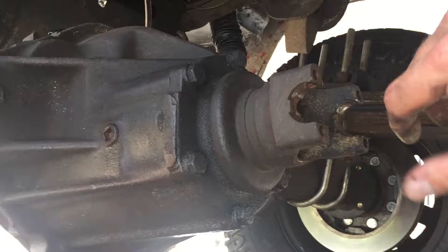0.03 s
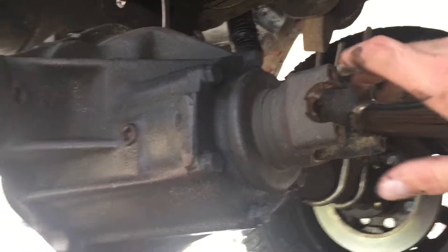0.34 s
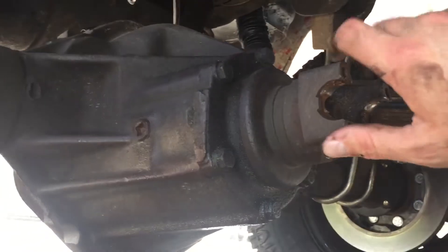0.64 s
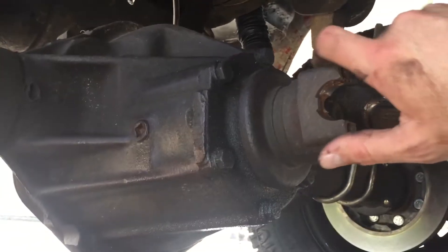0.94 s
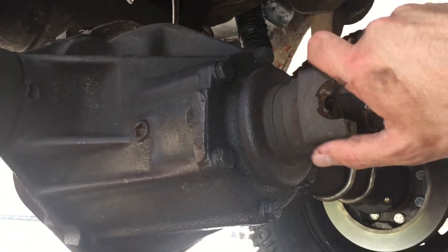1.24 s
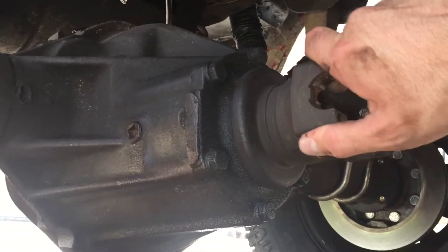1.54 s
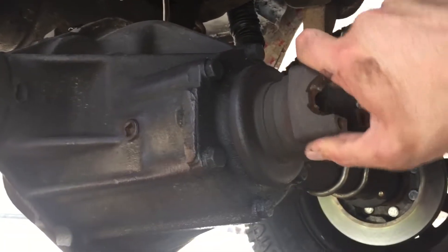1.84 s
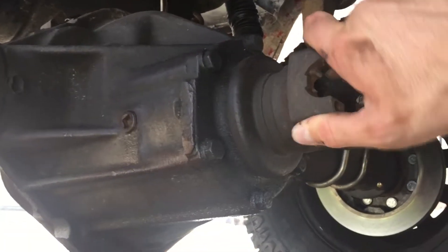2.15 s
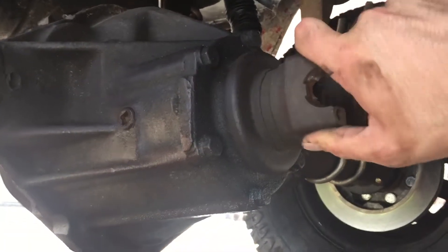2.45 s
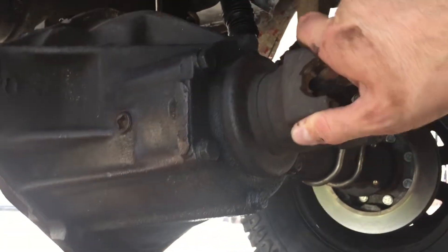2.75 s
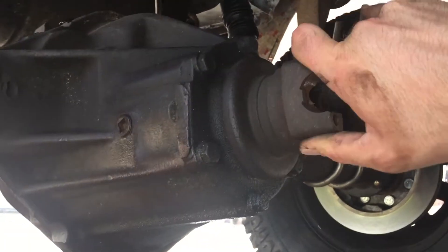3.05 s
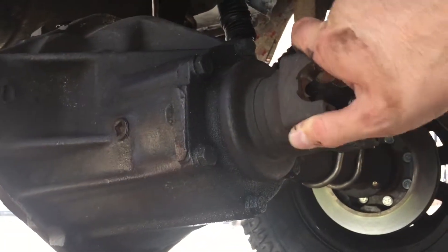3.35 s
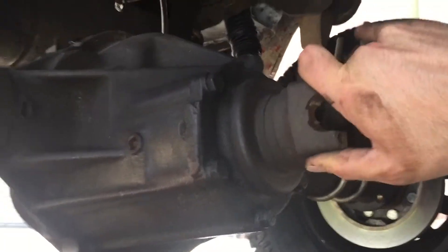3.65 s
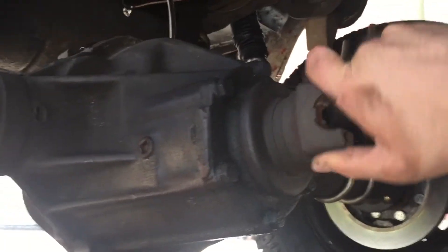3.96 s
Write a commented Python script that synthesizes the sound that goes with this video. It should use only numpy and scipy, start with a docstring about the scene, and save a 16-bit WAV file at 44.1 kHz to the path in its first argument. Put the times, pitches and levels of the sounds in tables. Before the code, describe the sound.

Repeated metal clanks and duller clunks from a hand-rocked axle yoke in a quiet workshop.

```python
"""Rocking a loose axle yoke

A hand rocks the pinion yoke of a vehicle axle to and fro in a quiet workshop. At each end of the
play the gear teeth meet: a bright clank one way, a duller clunk the other, each with a low boom in
the housing. Cloth and skin rustle and squeak faintly. Under it lie the room's rumble, a motor hum
and microphone hiss; the bass swells and bumps towards the end."""
import sys
import numpy as np
from scipy import signal
from scipy.fft import rfft, irfft
from scipy.io import wavfile

SR = 44100
rng = np.random.default_rng(int(sys.argv[2]) if len(sys.argv) > 2 else 0)


def unload_wav(signal):
    """Save mono or channel-first audio to the path in sys.argv[1] as 16-bit WAV at rate SR, clipped to [-1, 1]."""
    wavfile.write(
        sys.argv[1],
        SR,
        np.round(np.clip(np.atleast_2d(signal).T, -1, 1) * 32767).astype(np.int16),
    )


N = 176400
TIME = np.arange(N) / SR


def from_db(db):
    """Decibels to gain."""
    return 10 ** (np.asarray(db) / 20)


def decay(t, t60):
    """Exponential fall of 60 dB in t60 seconds."""
    return np.exp(-np.log(1000) * t / t60)


def attack(t, rise_s):
    """Rise from 0 towards 1 with time constant rise_s."""
    return 1 - np.exp(-t / rise_s)


def swell(crest_s, db, width_s):
    """A bell-shaped rise and fall of level."""
    return from_db(db) * np.exp(-.5 * ((TIME - crest_s) / width_s) ** 2)


def tone(hz, t):
    """A sine that starts at a random phase."""
    return np.sin(2 * np.pi * (hz * t + rng.random()))


def add(out, start_s, sound):
    """Mix a sound in at a time."""
    i = max(int(start_s * SR), 0)
    out[i:i + len(sound)] += sound[:max(N - i, 0)]


def lowpass(x, hz, order):
    """Dull a sound above hz; a higher order cuts more steeply."""
    return signal.sosfilt(signal.butter(order, hz, fs=SR, output="sos"), x)


def at_hz(points, hz):
    """Read (Hz, value) points on a log-frequency axis."""
    points = np.array(points)
    return np.interp(np.log(hz + 1e-9), np.log(points[:, 0]), points[:, 1])


def noise(colour, size=N):
    """Noise of rms 1, coloured by (Hz, relative dB) points."""
    hz = np.fft.rfftfreq(size, 1 / SR)
    x = irfft(rfft(rng.standard_normal(size)) * from_db(at_hz(colour, hz)), size)
    return x / np.sqrt(np.mean(x ** 2) + 1e-20)


def bands(x, edges_hz):
    """Split a sound at the edges, yielding each band's centre in Hz and its signal."""
    spectrum, hz = rfft(x), np.fft.rfftfreq(len(x), 1 / SR)
    for low, high in zip(edges_hz, edges_hz[1:]):
        yield np.sqrt(low * high), irfft(spectrum * ((hz >= low) & (hz < high)), len(x))


def drift(rate):
    """Glide through 400 random values, rate of them a second, then hold the last."""
    return np.interp(TIME * rate, np.arange(400), rng.standard_normal(400))


# Room air with microphone hiss, and a thin band in that hiss. Each row: frequency in Hz, relative dB.
AIR_COLOUR = [(20, -47), (32, -38), (45, -16), (58, 2), (80, -9.5), (120, -5), (165, -8), (210, -13.5),
              (450, -17), (700, -23), (1100, -28.5), (2200, -34), (3600, -35.5), (4400, -39.5),
              (4900, -40.5), (6000, -39), (7400, -43.5), (9000, -41.5), (10500, -55.5), (12000, -54.5),
              (15500, -59.5)]
HISS_COLOUR = [(3500, -59), (4150, 0), (4320, 1), (4550, -3), (4900, -29)]
# The motor's partials. Each row: frequency in Hz, rms level in dB.
HUM_PARTIALS = [(58, -62), (112.5, -57), (167, -53.5), (172, -50)]


def workshop():
    """Room tone: steady air and hiss, and a motor hum that wavers in pitch and level."""
    out = from_db(-48.5) * noise(AIR_COLOUR) + from_db(-76.5) * noise(HISS_COLOUR)
    wander_hz, waver_db = 0.83, 2.5
    for hz, db in HUM_PARTIALS:
        phase = 2 * np.pi * np.cumsum(hz + wander_hz * drift(8.73)) / SR
        out += np.sqrt(2) * from_db(db + waver_db * drift(8)) * np.sin(phase)
    return out


# The rumble's colour. Each row: frequency in Hz, relative dB.
RUMBLE_COLOUR = [(20, -37), (40, -1.5), (60, 2), (120, -6), (170, -3), (230, -7.5), (400, -18.5),
                 (1500, -67)]
# Its fader moves. Each row: time in seconds, level in dB.
RUMBLE_FADER = [(0, -49), (0.9, -71), (1.65, -52), (2.3, -52.5), (3.3, -48), (3.82, -50), (3.88, -32.5),
                (3.94, -37), (4, -34)]
# Soft bass bumps. Each row: crest in seconds, level in dB, half width in seconds, pitch in Hz.
BASS_BUMPS = [(1.255, -44, 0.013, 60.3), (2.80, -39, 0.019, 60), (2.961, -36, 0.014, 65),
              (3.137, -35.5, 0.015, 89.9), (3.48, -35.5, 0.017, 64.3), (3.57, -34.5, 0.018, 55),
              (3.662, -27.5, 0.015, 57.7), (3.90, -32, 0.012, 61), (3.984, -27, 0.024, 59.8),
              (3.915, -30.5, 0.0065, 105.5), (3.975, -36, 0.025, 117.7)]


def rumble():
    """Low rumble with soft bumps, growing towards the end as the rocking gets harder."""
    bed = from_db(np.interp(TIME, *np.transpose(RUMBLE_FADER))) * noise(RUMBLE_COLOUR)
    return bed + sum(swell(s, db, width) * tone(hz, TIME) for s, db, width, hz in BASS_BUMPS)


# Sleeve and skin shifting on metal. Each row: frequency in Hz, relative dB.
RUSTLE_COLOUR = [(200, 9.5), (280, 1.5), (460, 8), (700, 0.5), (1000, -20.5), (1400, -17.5), (2100, -14),
                 (4400, -35)]


def rustle():
    """Faint, uneven rubbing of the hand: each narrow band comes and goes on its own."""
    level_db, flutter_db = -61, 8.5
    strips = bands(noise(RUSTLE_COLOUR), edges_hz=np.geomspace(220, 4400, 27))
    return sum(band * from_db(level_db + flutter_db * drift(24.75)) for _, band in strips)


# Moving cloth. Each row: frequency in Hz, relative dB.
SLEEVE_COLOUR = [(300, -20), (600, 9), (1200, 0), (2200, 0.5), (2900, -34), (6000, -35)]


def sleeve():
    """A faint swish of cloth as the arm reaches in."""
    return swell(crest_s=0.48, db=-66.5, width_s=0.21) * noise(SLEEVE_COLOUR)


# The hand grips. Each row: crest in seconds, level in dB, half width in seconds, top pitch in Hz.
GRIP_SQUEAKS = [(.88, -59, .014, 3040), (1.095, -61, .009, 1975)]


def squeaks():
    """Skin slips on metal: tiny tones whose pitch arches with their level."""
    arch, roughness = .03, .014  # shares of the pitch
    out = np.zeros(N)
    for crest_s, db, width_s, hz in GRIP_SQUEAKS:
        bell = swell(crest_s, 0, width_s)
        pitch = hz * (1 - arch * (1 - bell) + roughness * drift(400))
        out += from_db(db) * bell * np.sin(2 * np.pi * np.cumsum(pitch) / SR)
    return out


# Rolling gears. Each row: frequency in Hz, relative dB.
ROLL_COLOUR = [(60, -10), (150, 1), (260, 3.5), (400, -10), (600, -8), (850, -20.5), (1200, -14),
               (1400, -46), (1650, -17), (2200, -37), (5000, -58)]
# Their movements. Each row: crest in seconds, relative level in dB, half width in seconds.
ROLL_SWELLS = [(1.46, -13.5, 0.056), (1.588, 1, 0.0072), (1.623, -2, 0.025), (1.82, -19, 0.078)]


def gear_roll():
    """The gears roll softly through their play as the hand takes hold."""
    return from_db(-42) * noise(ROLL_COLOUR) * sum(swell(*row) for row in ROLL_SWELLS)


def wall_echo(x):
    """One quiet, dull echo off the far wall."""
    delay_s = 0.045
    return from_db(-25) * np.interp(TIME - delay_s, TIME, lowpass(x, hz=1590, order=2), left=0)


# The wash under the vehicle. Each row: frequency in Hz, relative dB, 60 dB decay time in seconds.
WASH_BANDS = [(100, -4, 0.39), (197, -3.5, 0.83), (400, -6.5, 0.28), (774, -8.5, 0.28), (1570, -9, 0.21),
              (3260, -16.5, 0.12), (4850, -32, 0.18), (8000, -29, .1)]


def wash(t):
    """A diffuse tail after each blow, in which the lows last longest."""
    table = np.array(WASH_BANDS)
    colour, decay_times = table[:, :2], table[:, [0, 2]]
    half_octaves = bands(noise(colour, len(t)), edges_hz=70 * 2 ** np.arange(0, 7.6, .5))
    tail = sum(band * decay(t, at_hz(decay_times, hz)) for hz, band in half_octaves)
    return from_db(-32) * tail * attack(t, rise_s=0.0045)


# The axle on its springs. Each row: frequency in Hz, relative dB, 60 dB decay time in seconds.
BOOM_MODES = [(109, -46.5, 0.26), (149.8, -41.5, 0.17), (180.5, -39.5, 0.22), (206.2, -46.5, 0.46),
              (365.2, -57.5, 0.82), (453.3, -51, 0.21)]


def boom(t):
    """Low modes swell after the blow and come back a little louder a moment later."""
    out = np.zeros(len(t))
    for delay_s, lift_db in ((0, 0), (0.082, 2.5)):
        age = np.maximum(t - delay_s, 0)
        for hz, db, t60 in BOOM_MODES:
            out += from_db(db + lift_db) * tone(hz, age) * decay(age, t60) * attack(age, rise_s=0.013)
    return out


# Each tooth flank's main tone is a close pair of modes; both tables list forward, then back.
# Each row: lower mode in Hz, upper mode in Hz.
FLANK_PITCHES = [(1622, 1643.5), (1184, 1206)]
# Each row: relative level in dB, upper mode against lower in dB, 60 dB decay time in seconds.
FLANK_SHAPES = [(-30.5, -1, 0.16), (-40, 8, 0.17)]
# The modes of yoke, gears and housing. Each row: frequency in Hz, relative dB struck forward,
# relative dB struck back, 60 dB decay time in seconds.
AXLE_MODES = [(278,-35,-39,0.16), (334,-51,-36,0.073), (432.5,-71,-41,0.21), (538.2,-50,-37.5,0.19),
              (610,-40,-43,0.14), (743,-48,-50,0.11), (854,-35.5,-45,0.077), (917,-49.5,-45.5,0.37),
              (1017,-48,-40,0.22), (1122,-50,-35.5,0.16), (1183,-42.5,-36.5,0.22), (1330,-59,-41,0.076),
              (1420,-41.5,-39,0.12), (1492,-28,-33.5,0.048), (1513,-32,-38,0.068), (1745,-39,-33.5,0.059),
              (1784,-35,-31,0.049), (1945,-28,-32,0.046), (2084,-31,-44.5,0.07), (2275,-40,-43.5,0.091),
              (2374,-46,-62,0.17), (2657,-51,-62,0.14), (2680,-45,-64,0.03), (3090,-47.5,-51,0.14),
              (3215,-49,-45.5,0.062), (3350,-55,-44,0.098), (3770,-48,-90,0.082), (3920,-50,-73,.06),
              (4274,-55.5,-50.5,0.09)]


def ring(t, back):
    """The struck metal rings, its modes weighted by which tooth flank is hit."""
    lower_hz, upper_hz = FLANK_PITCHES[back]
    pair_db, upper_db, pair_t60 = FLANK_SHAPES[back]
    # The pair starts opposed, so it swells and beats.
    pair = np.sin(2 * np.pi * lower_hz * t) - from_db(upper_db) * np.sin(2 * np.pi * upper_hz * t)
    out = from_db(pair_db) * pair * decay(t, pair_t60)
    lift_db, spread_db = 1.74, 1.34  # each blow wakes the modes a little differently
    for hz, forward_db, back_db, t60 in AXLE_MODES:
        db = (back_db if back else forward_db) + lift_db + spread_db * rng.standard_normal()
        out += from_db(db) * tone(hz, t) * decay(t, t60)
    return out * attack(t, rise_s=0.0009)


def rebound(t):
    """A soft second touch wakes only the lower modes; pressed together, the teeth damp them."""
    return lowpass(ring(t, back=True), hz=1250, order=8) * decay(t, t60=0.13)


# Tooth on tooth. Each row: frequency in Hz, relative dB going forward, relative dB going back.
CONTACT_COLOURS = [(250, -45, 2), (600, -20, 7), (1100, -28, 1), (2210, 13, -8), (2640, -10, -17),
                   (3300, 5, -5.5), (3480, -5, -21), (4400, -25, -52), (6000, -52, -54)]


def rub(t, back):
    """The gears rub in a quick crescendo just before they meet, louder on the way back."""
    colour = np.array(CONTACT_COLOURS)[:, [0, 2]]
    rise_s = 0.022
    return from_db(-42 if back else -52) * noise(colour, len(t)) * np.exp(-t[::-1] / rise_s)


def crack(t, back):
    """A noise burst for the many heavily damped modes at contact, and its echo off the floor."""
    colour = np.array(CONTACT_COLOURS)[:, [0, 2 if back else 1]]
    direct = from_db(-31.5) * noise(colour, len(t)) * decay(t, t60=0.029) * attack(t, rise_s=0.0012)
    floor_echo = from_db(-3) * np.interp(t - 0.0043, t, direct, left=0)
    return direct + floor_echo


# The teeth meet. Each row: start in seconds, blow gain in dB, side (0 forward, 1 back), cut-off in Hz
# (lower is a softer contact), boom gain in dB, rebound against the blow in dB (back swings only).
SWINGS = [(1.9395, -2, 0, 1080, 4, -60), (2.1857, -6.5, 1, 4000, 6, -16), (2.4783, -1, 0, 5500, 3.5, -60),
          (2.758, -6.5, 1, 4400, 5, -14), (3.0589, -2, 0, 5500, 3, -60), (3.329, -4.5, 1, 4600, 6, -8),
          (3.6037, -0.5, 0, 6000, -3, -60), (3.8435, -2, 1, 3440, 1.5, -3)]


def yoke():
    """Each swing ends in a rub, a blow with its tail and a boom; going back, the teeth bounce once."""
    out, t = np.zeros(N), np.arange(SR // 2) / SR
    bounce_s = 0.058
    for start_s, db, side, cutoff_hz, boom_db, rebound_db in SWINGS:
        back = side == 1
        blow = ring(t, back) + crack(t, back) + wash(t)
        # The contact rolls the treble off gently at first, steeply higher up.
        blow = lowpass(blow, cutoff_hz, order=2)
        blow = lowpass(blow, min(2.6 * cutoff_hz, SR / 3), order=6)
        add(out, start_s, from_db(db) * blow + from_db(boom_db) * boom(t))
        if back:
            add(out, start_s + bounce_s, from_db(db + rebound_db) * rebound(t))
        add(out, start_s - t[-1], from_db(db) * rub(t, back))
    return lowpass(out, hz=6000, order=4)  # oily teeth give little top end


def scene():
    """Yoke, hand, rumble and room at one microphone."""
    clunks = yoke()
    handling = sleeve() + squeaks() + gear_roll() + rustle()
    return (clunks + wall_echo(clunks) + handling + rumble() + workshop())[None]


def record(dry):
    """A moment of silence, quick fades in and out, and a steep cut of the highest treble."""
    open_s, fade_s, top_hz = 0.1205, .004, 15750
    fader = np.clip(np.minimum(TIME - open_s + fade_s / 2, TIME[-1] - TIME) / fade_s, 0, 1)
    return signal.sosfilt(signal.ellip(10, .1, 80, top_hz, fs=SR, output="sos"), dry * fader)


dry = scene()
out = record(dry)
unload_wav(out)
```